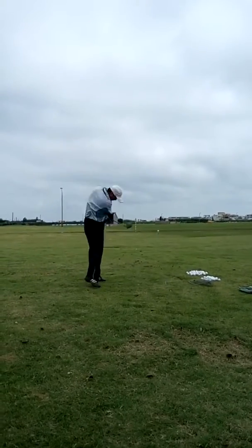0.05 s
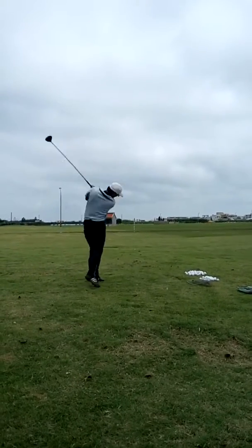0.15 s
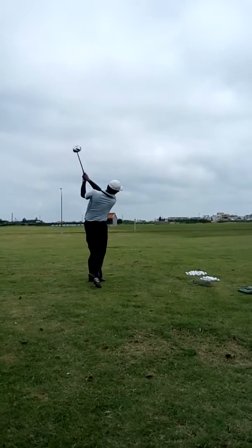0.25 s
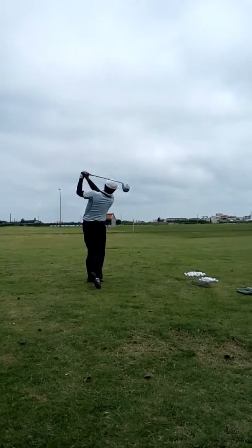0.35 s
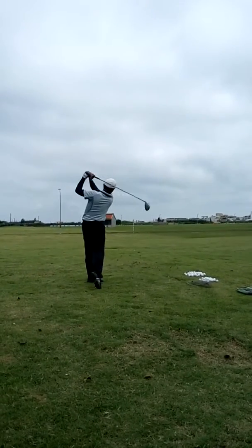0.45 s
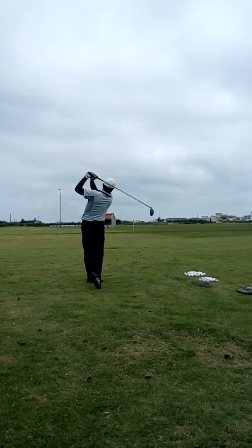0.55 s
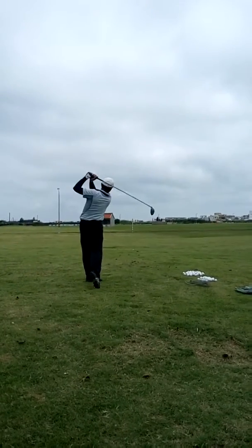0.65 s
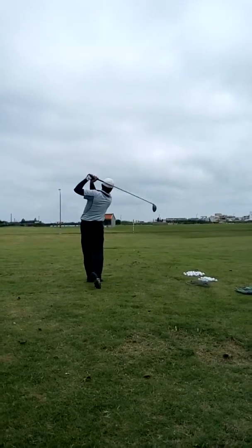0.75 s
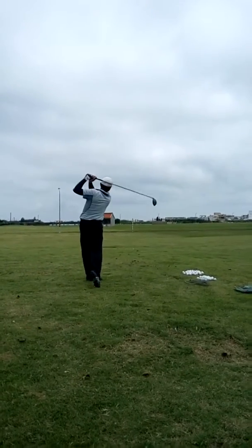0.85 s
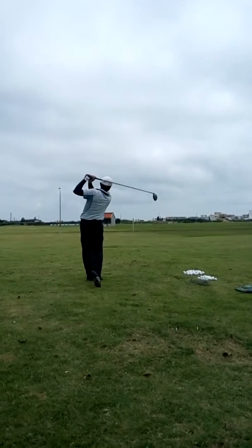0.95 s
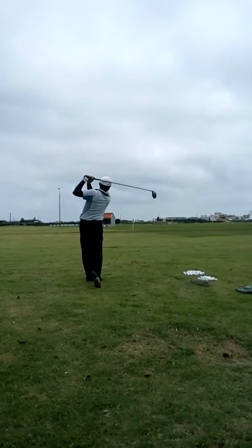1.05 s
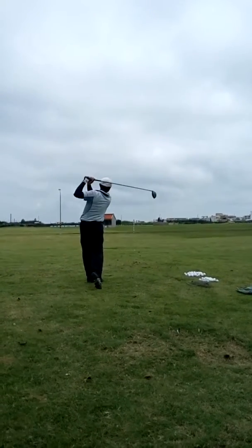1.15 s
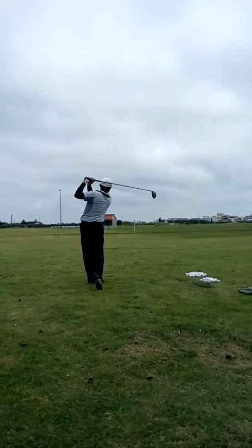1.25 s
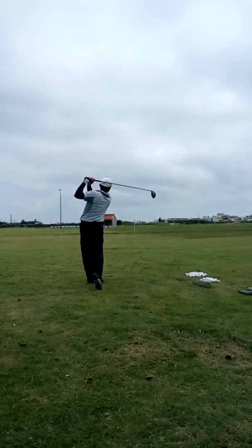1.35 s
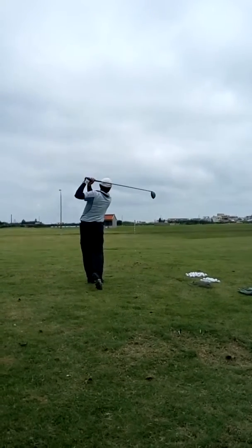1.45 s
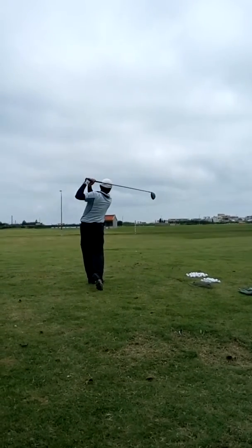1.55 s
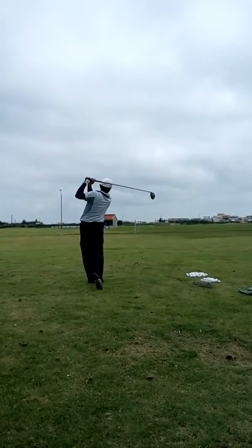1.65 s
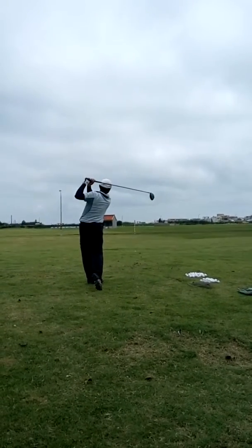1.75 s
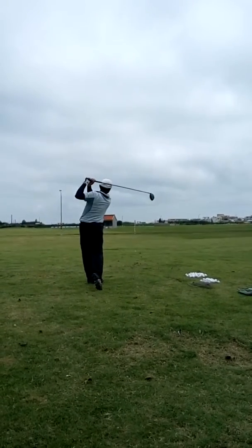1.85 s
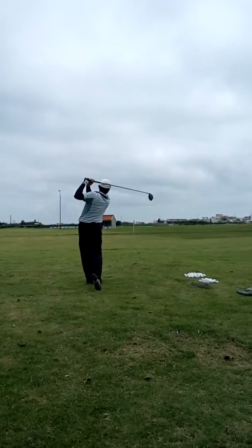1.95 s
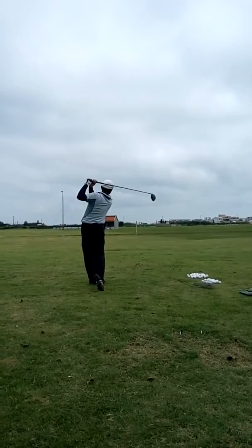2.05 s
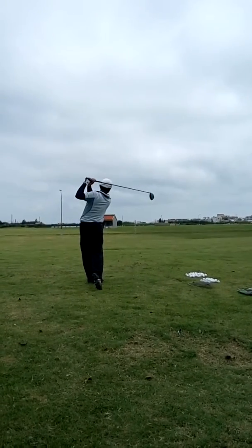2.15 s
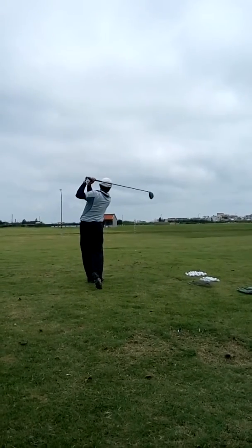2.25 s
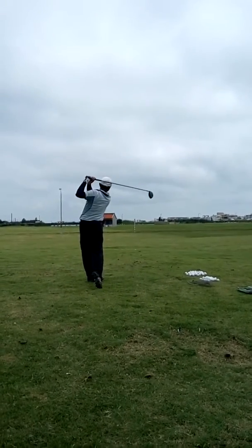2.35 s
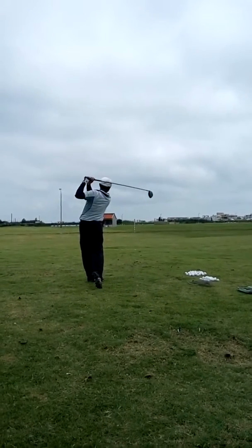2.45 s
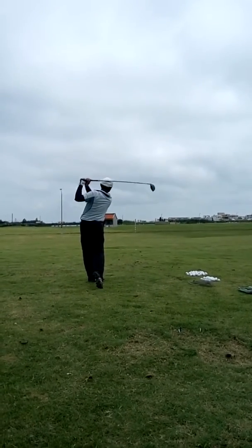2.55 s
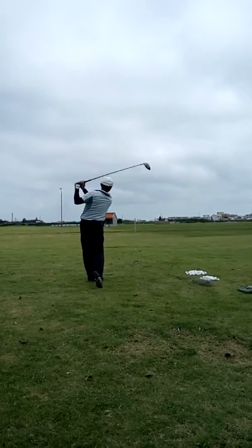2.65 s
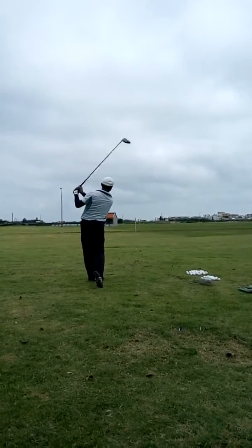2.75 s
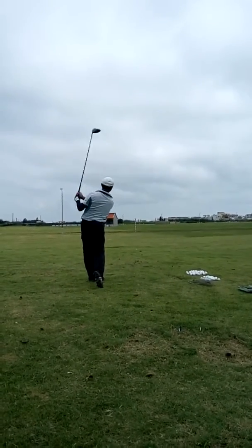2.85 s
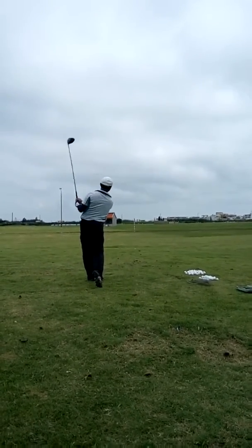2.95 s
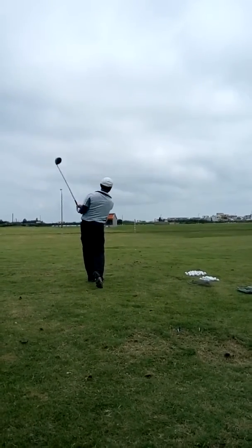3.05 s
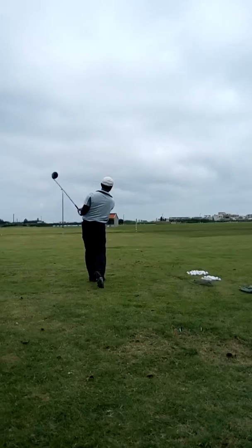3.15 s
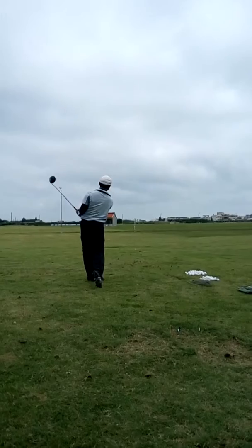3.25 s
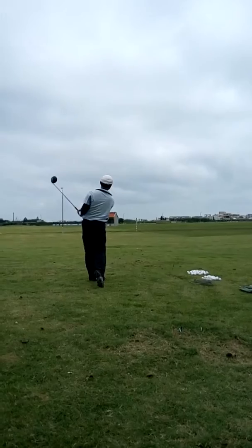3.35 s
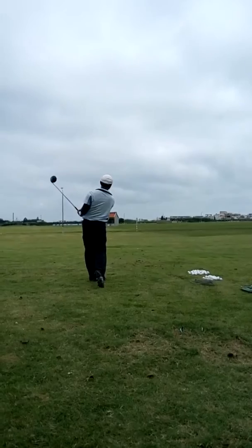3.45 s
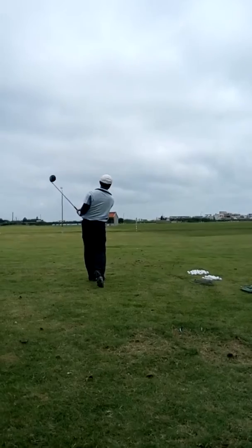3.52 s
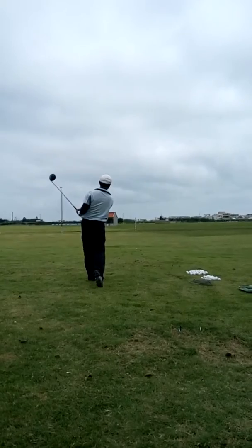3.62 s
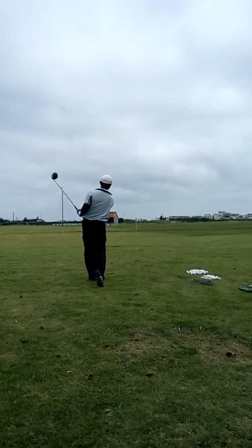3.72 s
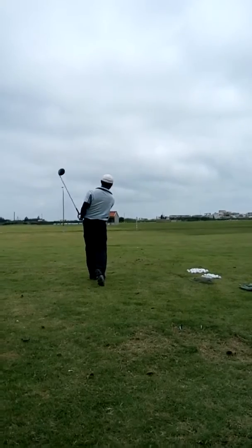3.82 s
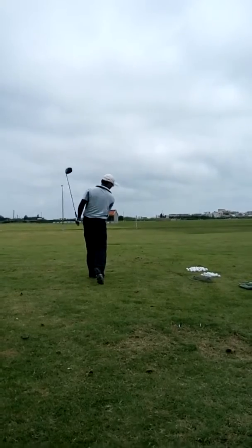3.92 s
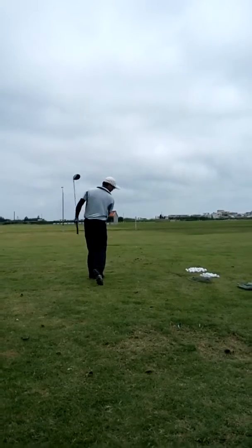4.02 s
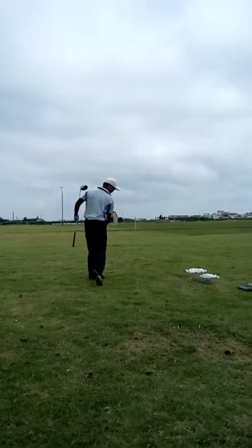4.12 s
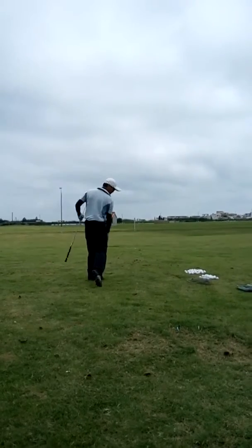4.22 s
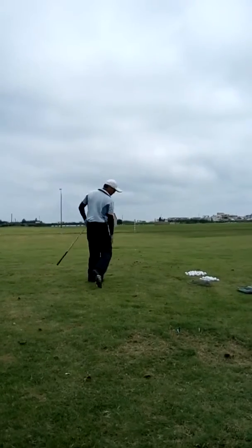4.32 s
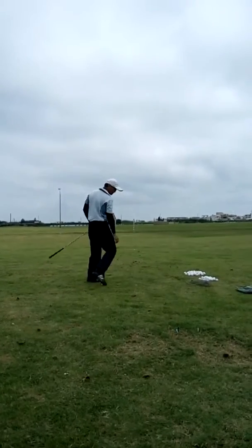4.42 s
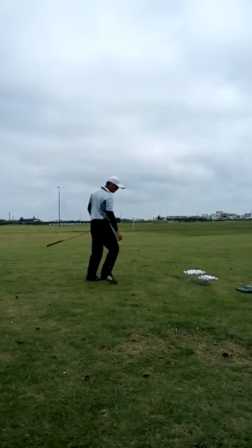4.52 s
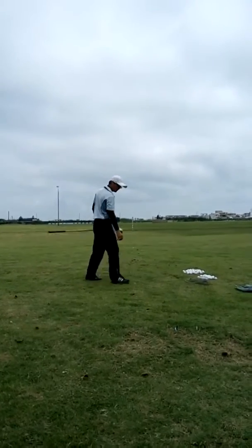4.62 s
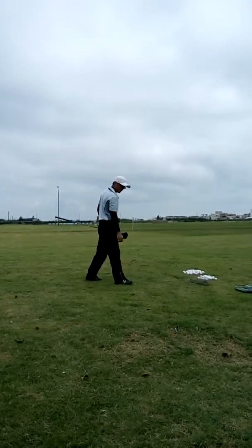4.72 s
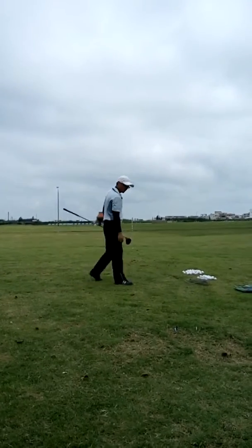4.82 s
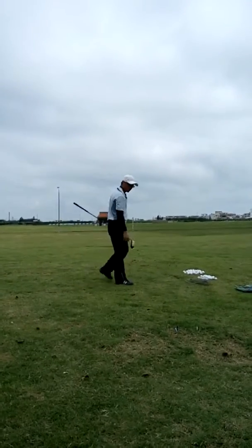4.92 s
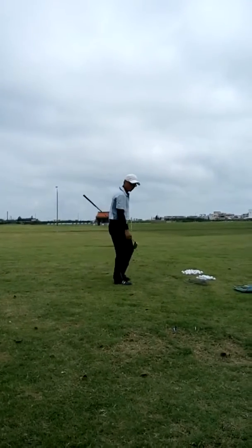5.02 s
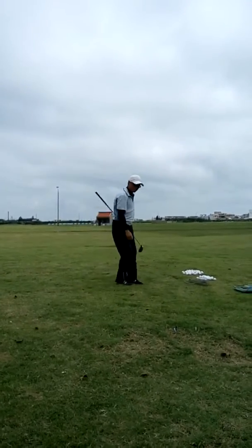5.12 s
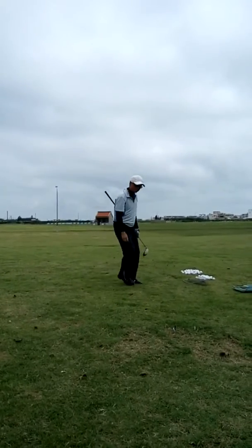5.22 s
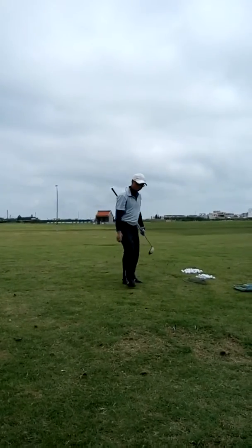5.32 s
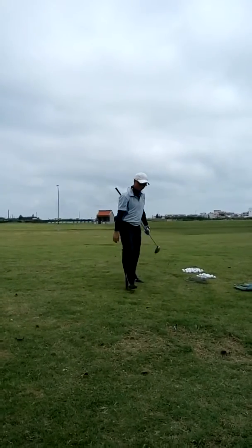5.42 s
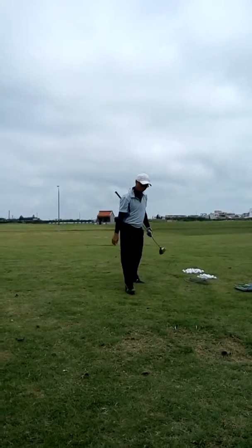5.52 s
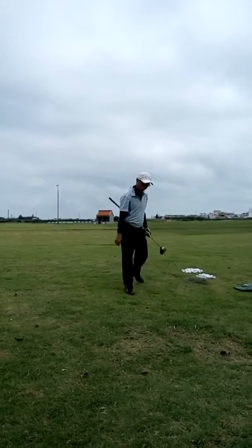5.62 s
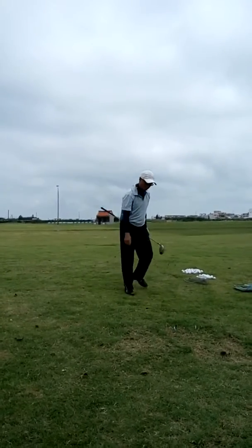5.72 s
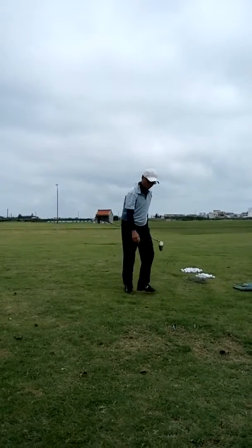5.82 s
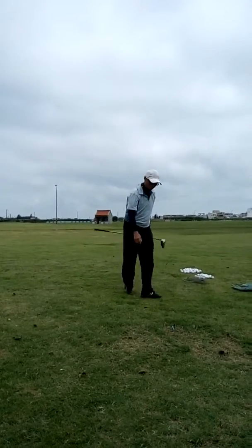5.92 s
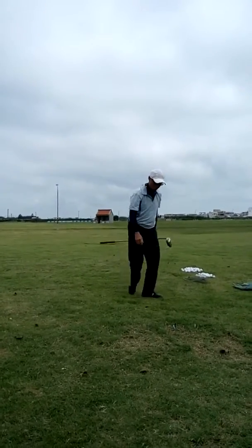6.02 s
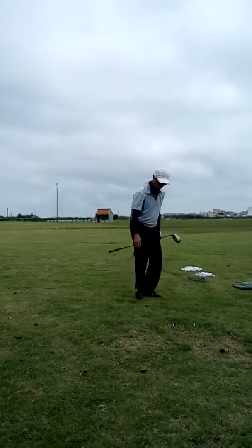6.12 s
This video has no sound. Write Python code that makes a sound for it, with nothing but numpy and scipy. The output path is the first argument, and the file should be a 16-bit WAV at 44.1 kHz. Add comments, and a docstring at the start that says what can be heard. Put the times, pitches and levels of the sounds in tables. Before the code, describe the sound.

A short rising whoosh ends in a hard, dry golf strike with a hollow metal ring. Afterwards only the outdoors remains: a lively songbird chirping the same phrase over and over at left, other birds twittering far off, and low wind gusts thumping the unprotected stereo microphone, mainly its left side. The gusts ease later, the bird song becomes buzzy, and a faint machine drone emerges far away.

```python
"""Golf shot on a breezy range

A metal club swishes down as a tone in noise, then cracks a ball: noise bursts, a knock and ringing modes.
Gusts of shaped noise and popping eddies buffet two microphone ports, the left one hardest. A songbird of
gliding near-sines repeats one phrase, then a buzzier one. A second bird whistles four falling notes over
far twitters, field hiss, thin tones and a late machine drone."""
import sys
import numpy as np
from scipy import signal
from scipy.fft import rfft, irfft
from scipy.io import wavfile
from scipy.ndimage import uniform_filter1d

SR = 44100
rng = np.random.default_rng(int(sys.argv[2]) if len(sys.argv) > 2 else 0)


def unload_wav(signal):
    """Save mono or channel-first audio to the path in sys.argv[1] as 16-bit WAV at rate SR, clipped to [-1, 1]."""
    wavfile.write(
        sys.argv[1],
        SR,
        np.round(np.clip(np.atleast_2d(signal).T, -1, 1) * 32767).astype(np.int16),
    )


def rack_gain(trim_db):
    """Turn a fader trim in dB into the linear factor to multiply a signal by."""
    fader = np.asarray(trim_db, float)
    return 10 ** (fader / 20)


N = 272097  # length in samples

# Colour of the far field hiss. Each row: frequency in Hz, relative level in dB per Hz.
FIELD_SPECTRUM = [(180, -28), (300, -11), (445, -20.5), (1160, -27.5), (3720, -32), (4250, -27),
                  (4920, -33.5), (5900, -29), (6840, -41), (7430, -42.5), (7900, -51.5), (10000, -46),
                  (12500, -46.5), (14400, -47.5), (15300, -52)]
FIELD_DB = -68  # middle hiss level, before the tilt to the left
# Resonances of a far machine. Each row: frequency in Hz, width in Hz, relative level in dB.
MACHINE_MODES = [(785, 190, -0.5), (1190, 130, -3), (1850, 170, -1.5), (2190, 100, -6), (2680, 240, -5)]
# Loudness of the machine. Each row: time in seconds, level in dB.
MACHINE_LEVEL = [(4.9, -93), (5.4, -72), (5.9, -68.5), (6.17, -69)]
# Thin tones of fixed pitch. Each row: frequency in Hz, left level in dB, right level in dB.
THIN_TONES = [(7340, -95.5, -78), (14740, -96.5, -84)]
# Silence in the thin tones: its start and end in seconds.
TONE_PAUSE = (3.6, 3.87)

# Colour of the wind rumble. Each row: frequency in Hz, relative level in dB per Hz.
RUMBLE_SPECTRUM = [(15, -45.5), (25, -21.5), (60, 0), (100, 9.5), (140, 5.5), (200, 4), (270, -9),
                   (340, -17.5), (700, -50.5), (1500, -110)]
# Sizes of the small eddies in the roar. Each row: frequency in Hz, relative level in dB.
EDDY_SIZES = [(230, 7.5), (400, 1), (700, -8.5), (1200, -29.5), (1900, -33.5)]
# Wavering breeze under the gusts. Each row: time in seconds, relative rumble level in dB,
# left over right in dB.
BREEZE_PATH = [(0.0, -47, -5.5), (0.3, -38.5, 18.5), (0.55, -62, -9.5), (0.66, -49.7, 5), (0.9, -41, 9.5),
               (1.0, -54, 4), (1.25, -38, 7.5), (1.5, -44, 1.5), (1.75, -29, 18.5), (2.15, -50.0, 9.5),
               (2.4, -39.5, 17), (2.6, -39.5, 2.5), (3.0, -46, 5), (3.6, -39, 8.0), (3.98, -50.5, -1.5),
               (4.4, -53, 0), (4.9, -40.5, 9), (5.5, -48.5, 3), (6.17, -51.5, -1)]
# Passing gusts. Each row: peak time in seconds, length in seconds, relative rumble level in dB,
# left over right in dB.
GUST_EVENTS = [(0.2, 0.11, -39.5, 3), (0.332, 0.108, -50.5, -15.5), (0.459, 0.13, -36.5, 2.5),
               (0.57, 0.13, -34.5, 14.5), (0.74, 0.081, -38, 40.0), (0.81, 0.05, -45, -15),
               (1.17, 0.165, -49.5, -12), (1.348, 0.1, -31.5, 9.5), (1.483, 0.22, -32.5, 18),
               (1.557, 0.06, -32.5, 2), (1.647, 0.073, -26.5, 38), (1.714, 0.098, -34, -16.5),
               (1.831, 0.11, -20.5, 30), (1.968, 0.15, -17.5, 41.5), (2.134, 0.22, -22, 46.5),
               (2.284, 0.17, -18, 29), (2.422, 0.043, -21.5, 41), (2.663, 0.05, -40, 40.0),
               (2.746, 0.089, -31, 8), (2.9, 0.231, -36.5, 0.4), (3.034, 0.065, -28.5, 39),
               (3.081, 0.021, -23, 7), (3.292, 0.23, -38.2, 40.0), (3.471, 0.024, -33.5, 39),
               (3.55, 0.057, -45, -16.5), (3.852, 0.097, -35, 24), (3.915, 0.059, -28, 17.5),
               (4.09, 0.36, -46, 36), (4.226, 0.33, -36.5, 21.5), (4.344, 0.12, -38.5, 4),
               (4.456, 0.13, -37, 40.0), (4.616, 0.38, -38.1, 6), (5.041, 0.036, -28, 18),
               (5.146, 0.101, -37.5, 40.0), (5.389, 0.056, -41.5, 42.5), (5.67, 0.1, -33.5, 10.5),
               (5.776, 0.12, -41, 8), (5.961, 0.16, -41, 12), (6.155, 0.12, -40.5, 38)]
# Steady deep rumble. Each row: frequency in Hz, relative level in dB per Hz.
DEEP_SPECTRUM = [(15, -26), (25, -8), (45, -1), (70, -6.5), (110, -30), (300, -80.5)]
DEEP_DB = -57
# Roar gain at a wind power of -30.5 dB, its rise in dB per dB of wind, averaging time in seconds.
ROAR_DB, ROAR_SLOPE, ROAR_MEMORY_S = -49, 1.3, 0.094

# Single eddies at the left port. Each row: time in seconds, relative dip level in dB,
# relative sharp tip level over the dip in dB.
POP_EVENTS = [(0.541, -26.5, -19.5), (0.57, -37.5, -12), (0.94, -42.5, -19), (1.314, -22, -14),
              (1.399, -20, -7), (1.437, -25, -9), (1.495, -30, -26), (1.638, -26.5, -28.5),
              (1.788, -17.5, -8), (1.817, -19, -3.5), (1.825, -19, -7), (1.839, -15.5, 0.5),
              (1.907, -19, -17.5), (1.954, -22, 0), (1.965, -21, -2.5), (1.981, -18.5, -14.5),
              (1.999, -21.5, -15), (2.029, -32.5, -26.5), (2.063, -19, -24), (2.095, -21.5, -16),
              (2.117, -20, -31), (2.156, -18.5, -15.5), (2.184, -20.5, -3), (2.205, -26, -7),
              (2.235, -30, -26), (2.266, -23, -23), (2.288, -16.5, -9), (2.295, -18.5, 1),
              (2.309, -14, -13), (2.335, -13, -19.5), (2.348, -18, -15), (2.41, -29.5, -29),
              (2.431, -29.5, -30.5), (2.75, -37.5, -20), (3.08, -36.5, -21), (3.271, -32.5, -13.5),
              (3.848, -33, -24), (3.92, -32, -7), (4.578, -30, -16.5), (4.726, -39.5, -23.5),
              (4.8, -42, -22), (4.96, -37.5, -30), (5.046, -44.5, -11.5), (5.094, -38, -10),
              (5.171, -35, -31), (5.633, -31, -39), (5.673, -47, -22)]
# Pitch of a pop listed at -22.5 dB; harder pops are smaller eddies (dB of pitch per dB).
POP_HZ, SHRINK = 432, .25
TIP_RATIO = 2.04  # pitch of the sharp tip over that of the pop
LEAD_S, FLUTTER_S = .02, 0.0066  # flutter starts this long before the pop; its fading time

# Held pitches of the second bird. Each row: start in seconds, held pitch in Hz, relative level in dB.
WHISTLE_NOTES = [(3.634, 2076, -68), (4.137, 2100, -70.5), (4.482, 2123, -65.5), (4.853, 2098, -66.5)]
# Shape of one whistle, dropping onto the held pitch. Each row: seconds from its start,
# pitch over the held one, relative level in dB.
WHISTLE_SHAPE = [(0, 1.2, -14), (.01, 1.15, -3), (.035, 1.03, 1), (.095, 1.0, -3.5), (.115, 1.0, -21)]
# Faint single notes of birds further off. Each row: start in seconds, length in seconds,
# first pitch in Hz, last pitch in Hz, middle level in dB.
STRAY_NOTES = [(0.698, 0.0258, 4210, 4484, -66), (1.461, 0.024, 6040, 6360, -72),
               (1.505, 0.025, 5900, 6020, -61), (1.55, 0.07, 4700, 5020, -70),
               (1.591, 0.065, 3350, 3196, -72.5), (1.92, .03, 4274, 4165, -65.5),
               (3.472, .06, 5760, 5640, -66.5), (3.541, 0.05, 2870, 2760, -71),
               (3.72, 0.079, 5370, 5000, -61.5), (3.884, 0.1, 4600, 4630, -63),
               (4.839, .035, 3330, 3170, -65), (5.51, 0.019, 2730, 2820, -73),
               (5.716, 0.067, 5380, 5980, -65.5), (5.859, 0.026, 4120, 5080, -57.5)]
CHORUS_DB, CHORUS_PER_S = -65, 20  # far small birds: base level, twitters per second
OCTAVE = .007  # share of the octave in a note

# Notes of the clear phrase. Each row: start, middle and end levels in relative dB, warble depth in Hz,
# warbles per second, and a pitch path whose rows are seconds from the phrase start and pitch in Hz.
CLEAR_PHRASE = [ ((-18, -12.5, -12), 0, 0, [(.014, 4900), (.024, 5600), (.033, 5800)]), ((-1.2, -12, -14),
                0, 0, [(.032, 5600), (.041, 4380), (.05, 4110), (.06, 4120)]), ((0, -6, -8),
                0, 0, [(.058, 6270), (.073, 5810), (.081, 5900), (.09, 5500), (.102, 5000), (.117, 4200)]),
                ((-2, -6, -6), 0, 0, [(.12, 5950), (.152, 5900), (.166, 5850)]), ((-4.5, -9.5, -25),
                0, 0, [(.171, 6160), (.177, 6500), (.186, 7200), (.192, 7250)]), ((-17.5, -10.5, -17.5),
                0, 0, [(.189, 6700), (.196, 5300)]), ((1.8, 0, -4.5), 0, 0, [(.197, 6250), (.201, 6300),
                (.214, 5600)]), ((-9, -4, -8), 0, 0, [(.217, 3830), (.26, 4330), (.27, 4130), (.279, 3900),
                (.295, 3045)]), ]
# Notes of the buzzy phrase. Each row: start, middle and end levels in relative dB, warble depth in Hz,
# warbles per second, and a pitch path whose rows are seconds from the phrase start and pitch in Hz.
BUZZY_PHRASE = [ ((-4, -11, -11.5), 0, 0, [(.007, 7020), (.024, 5339)]), ((-1, -8.5, -3.5),
                0, 0, [(.027, 6450), (.041, 5290), (.048, 5400), (.058, 6140), (.066, 6150), (.073, 5340)]),
                ((-6, -12, -19), 69, 150, [(.068, 6340), (.112, 6250)]), ((-1, -12, -3),
                0, 0, [(.094, 5950), (.099, 6414), (.107, 6213), (.114, 6060), (.126, 5550)]),
                ((-10, -17, -17), 0, 0, [(.132, 4380), (.15, 5430)]), ((-2, -4.5, -1), 0, 0, [(.15, 5470),
                (.168, 5460), (.189, 6076)]), ((-4.5, -5.5, -13.5), 244, 200, [(.19, 6200), (.21, 5830),
                (.245, 5870), (.262, 5840)]), ((-5.5, -7, -11), 200, 303, [(.197, 5300), (.225, 5120),
                (.268, 5030)]), ((-12, -5.5, -16.5), 0, 0, [(.265, 4530), (.288, 3290)]), ((-10, -8, -8),
                370, 61, [(.29, 4000), (.392, 4030)]), ((-5.5, -1, -13), 200, 200, [(.39, 3950),
                (.425, 4240), (.445, 4280)]), ]
# Clear phrases sung. Each row: start in seconds, relative level in dB, extra for the closing note in dB.
CLEAR_TIMES = [(-.044, -45.5, -1.5), (0.341, -44, -0.5), (0.799, -44.5, -4), (1.191, -48, -2),
               (1.577, -44.5, -1.5), (1.967, -46.5, -2), (2.36, -45, -0.5), (2.748, -49.5, 1.5),
               (3.145, -45, -2), (3.535, -48, 1), (3.927, -46.5, -1), (4.316, -48, 1)]
# Buzzy phrases sung. Each row: start in seconds, relative level in dB, extra for the closing note in dB.
BUZZY_TIMES = [(4.72, -46, -20), (5.26, -45, -3), (5.81, -45.5, -5)]
RIGHT_DB = -14.5  # right under left before the echoes: the songbird is on the left

# Tone shed by the shaft, following its speed. Each row: time in seconds, pitch in Hz.
SWING_PITCH = [(.09, 303), (.13, 476), (.16, 642.5), (.18, 796), (.2, 860), (.228, 848), (.25, 760),
               (.29, 589), (.36, 402.3)]
TOP_HZ, TONE_DB, HISS_DB = 860, -43, -47.5  # pitch at top speed, and the tone and hiss levels there
TONE_POWER, HISS_POWER = 5.2, 8.6  # amplitude grows as these powers of speed

# Ringing modes of the hollow club head. Each row: frequency in Hz, relative level in dB,
# time to fall 60 dB in seconds.
HEAD_MODES = [(2380, -15.5, .07), (3790, -10, .06), (4320, -9, 0.13), (5010, -8, 0.13), (5550, -2, 0.09),
              (5900, 0.5, 0.052), (6150, -3, 0.13), (6450, -8.5, 0.11), (8100, -26, 0.062),
              (9030, -23.5, 0.17), (11188, -15, 0.034), (11900, -23.5, 0.073)]
# Colour of the crack. Each row: frequency in Hz, relative level in dB per Hz.
CRACK_SPECTRUM = [(150, -46), (400, -15), (900, -20), (1700, -24), (2500, -22), (3200, -24), (4200, -8.5),
                  (4800, -19.5), (5900, -1.5), (6700, -12), (7500, -24), (11500, -28.5), (15300, -38.5)]
# Fading of the scatter off the grass. Each row: frequency in Hz, time to fall 60 dB in seconds.
TAIL_FADE = [(400, 0.082), (1500, .11), (4200, 0.17), (6000, 0.13), (8000, .11), (12000, 0.14)]
# Hum of the ball as it leaves. Each row: time in seconds, pitch in Hz, level in dB.
BALL_HUM = [(.29, 2010, -50), (.32, 2080, -69), (.35, 2100, -75), (.385, 2150, -67)]
HIT_S, HIT_DB = .2343, -3.5  # moment of the hit, gain of the whole blow
CRACK_DB, KNOCK_DB, TAIL_DB = 4.5, -13, -7  # relative levels within the blow
FAR_DB, FAR_T60 = -30.5, 0.73  # slower echo from the far edge: relative level, seconds to fall 60 dB


def evened(x):
    """Scales a sound to an rms (average strength) of 1."""
    return x / np.sqrt(np.mean(x ** 2) + 1e-20)


def read(points, hz):
    """Reads a spectrum on a log-frequency axis."""
    f, value = np.transpose(points)
    return np.interp(np.log(hz + 1), np.log(f + 1), value)


def curve(rows):
    """Reads the columns of a timed table at every sample."""
    s, *columns = np.transpose(rows)
    return [np.interp(np.arange(N) / SR, s, c) for c in columns]


def add(mix, s, sound):
    """Mixes a sound in at time s, cut at both ends of the mix."""
    at = round(s * SR)
    sound = sound[..., max(-at, 0):]
    part = mix[..., max(at, 0):][..., :sound.shape[-1]]
    part += sound[..., :part.shape[-1]]


def coloured(x, points):
    """Filters a sound by a spectrum in dB."""
    size = x.shape[-1]
    hz = np.arange(size // 2 + 1) * SR / size
    return irfft(rfft(x) * rack_gain(read(points, hz)), size)


def lumps(seconds, shape):
    """Slow random wandering of rms 1: noise averaged twice."""
    size = int(seconds * SR)
    once = uniform_filter1d(rng.standard_normal(shape), size)
    return evened(uniform_filter1d(once, size))


def resonate(x, hz, width):
    """A resonance of gain 1 whose pitch may follow a curve."""
    turn = np.exp(2j * np.pi * np.cumsum(hz * np.ones(x.shape[-1])) / SR)
    r = np.exp(-np.pi * width / SR)
    # shift the pitch down to zero, smooth, shift back
    return 2 * (turn * signal.lfilter([1 - r], [1, -r], x / turn)).real


def eddy(hz):
    """One swirl passing the port: a pressure dip with soft shoulders."""
    u = np.pi * hz * np.arange(-400, 401) / SR
    return (2 * u ** 2 - 1) * np.exp(-u ** 2)


def note(rows, stretch=1):
    """A near-sine on a pitch curve; a slow warble sounds only at its two ends, a fast one buzzes unevenly."""
    s, *columns = np.transpose(rows)
    t = np.arange(s[0], s[-1], 1 / SR)
    # depth and rate of the warble are zero where the table has no such columns
    hz, db, depth, per_s = ([np.interp(t, s, c) for c in columns] + [0 * t, 0 * t])[:4]
    uneven = 1 + 0.0037 * per_s * evened(uniform_filter1d(rng.standard_normal(len(t)), 150))
    warble = np.sin(2 * np.pi * np.cumsum(per_s * uneven) / SR)
    hz = stretch * hz + depth * np.tanh(2 * warble)
    hz *= 1 + .012 * evened(uniform_filter1d(rng.standard_normal(len(t)), 60))  # a slightly hoarse throat
    slow = (depth > 0) & (per_s < 100)
    gate = np.where(slow, warble ** 4, 1 - .5 * (depth > 0) * warble ** 2)
    edge = np.minimum(np.minimum(t - s[0], s[-1] - t) / .003, 1)
    turns = 2 * np.pi * np.cumsum(hz) / SR
    return s[0], rack_gain(db) * gate * edge * (np.sin(turns) + OCTAVE * np.sin(2 * turns))


def echoes(x, t60, wet_db, haze_db):
    """Reflections from hedges and ground, other ones at each port, and a longer haze."""
    t = np.arange(SR // 2) / SR
    fade = rack_gain(-60 * t / t60) * np.minimum(t / .015, 1) + rack_gain(haze_db - 60 * t / 0.46)
    chosen = rng.random((2, len(t))) < .05
    taps = rng.standard_normal((2, len(t))) * chosen * fade * (t > .003)
    return rack_gain(wet_db) * signal.oaconvolve(x, taps / np.linalg.norm(taps[0]), axes=1)[:, :N]


def field():
    """Far hiss, a distant machine made of resonances in noise, and two thin tones that pause."""
    hiss = evened(coloured(rng.standard_normal((2, N)), FIELD_SPECTRUM))
    hiss = hiss * rack_gain(FIELD_DB + lumps(0.12, N)) * rack_gain([[1.5], [-1.5]])
    noise = rng.standard_normal((2, N))
    drone = np.zeros((2, N))
    for hz, width, db in MACHINE_MODES:
        drone += rack_gain(db) * resonate(resonate(noise, hz, width), hz, width) / np.sqrt(width)
    drone = evened(drone) * rack_gain(curve(MACHINE_LEVEL)[0])
    t = np.arange(N) / SR
    tones = np.zeros((2, N))
    for hz, left_db, right_db in THIN_TONES:
        fuzzy = np.sin(2 * np.pi * hz * t) + 0.22 * evened(resonate(noise, hz, 30))
        tones += rack_gain([[left_db], [right_db]]) * fuzzy
    tones *= (t < TONE_PAUSE[0]) | (t > TONE_PAUSE[1])
    return hiss + drone + tones


def split(pan_db):
    """Shares of wind power at the left and right ports."""
    return np.array([1 / (1 + rack_gain(-2 * pan_db)), 1 / (1 + rack_gain(2 * pan_db))])


def wind():
    """Lumpy rumble and a roar of small eddies, unrelated at the two ports; gusts ride on the breeze."""
    breeze_db, pan_db = curve(BREEZE_PATH)
    power, t = split(pan_db) * rack_gain(2 * breeze_db), np.arange(N) / SR
    for s, length, db, gust_pan_db in GUST_EVENTS:
        swell = np.exp(-(3.73 * (t - s) / length) ** 2)
        power = power + split(gust_pan_db)[:, None] * rack_gain(2 * db) * swell
    recent_db = uniform_filter1d(10 * np.log10(power), int(ROAR_MEMORY_S * SR))
    roar_db = ROAR_DB + ROAR_SLOPE * (recent_db + 30.5) + 2.8 * lumps(0.015, (2, N))
    rumble = evened(coloured(rng.standard_normal((2, N)), RUMBLE_SPECTRUM))
    rumble = rumble * rack_gain(1.8 * lumps(0.013, (2, N)))
    roar, clump_db = np.zeros((2, N)), 2.0 * lumps(0.0027, (2, N))
    for hz, db in EDDY_SIZES:
        # about 700 swirls a second, gathered in clumps
        swirls = (rng.random((2, N)) < 700 / SR) * rng.standard_normal((2, N)) * rack_gain(clump_db)
        # faster air sheds smaller eddies
        fast_db = .12 * np.log2(hz / EDDY_SIZES[0][0]) * (roar_db + 31.5)
        roar += evened(signal.oaconvolve(swirls, eddy(hz)[None], "same")) * rack_gain(db + fast_db)
    deep = rack_gain(DEEP_DB) * evened(coloured(rng.standard_normal((2, N)), DEEP_SPECTRUM))
    return deep + np.sqrt(power) * rack_gain(3.0) * rumble + rack_gain(roar_db) * roar


def pops():
    """Pressure dips with a sharp tip, each inside a short flutter of like eddies."""
    out, t = np.zeros(N), np.arange(4000) / SR
    for s, db, tip_db in POP_EVENTS:
        haste = np.where(t < LEAD_S, 2.5, 1)  # rises faster than it falls
        train = 0.043 * rng.standard_normal(4000) * np.exp(-abs(t - LEAD_S) / FLUTTER_S * haste)
        train[round(LEAD_S * SR)] = 1
        hz = POP_HZ * rack_gain(SHRINK * (db + 22.5))
        shape = 1.17 * eddy(.5 * hz) + eddy(hz) + rack_gain(tip_db - 3.5) * eddy(TIP_RATIO * hz)
        # the dip is centred 2 ms after its listed time
        add(out, s - 400 / SR - LEAD_S + .002, rack_gain(db + 2.0) * signal.oaconvolve(train, shape))
    return out * [[1], [0]]  # left port only


def other_birds():
    """Four falling whistles, stray notes, and far twitters heard only as their scatter."""
    near, far = np.zeros((2, 2, N))
    for s, hz, db in WHISTLE_NOTES:
        add(near, s, note(WHISTLE_SHAPE, hz)[1] * rack_gain(db + np.array([[6], [5]])))
    for s, length, first_hz, last_hz, db in STRAY_NOTES:
        middle = (s + length / 2, (first_hz + last_hz) / 2, db)
        add(near, *note([(s, first_hz, db - 8), middle, (s + length, last_hz, db - 10.0)]))
    for when, high, glide, size in rng.random((int(CHORUS_PER_S * N / SR), 4)):
        hz = 4200 + 2200 * high
        last_hz = hz * (.9 + .2 * glide)
        twitter = note([(0, hz, -6.5, 150.5, 60.13), (.06, last_hz, -3.5, 152.3, 59.24)])[1]
        add(far, when * N / SR, twitter * rack_gain(CHORUS_DB + 9.2 * size - np.array([[0], [6]])))
    return near + echoes(near, 0.12, -1, -35) + echoes(far, 0.14, 0, -26.0)


def songbird():
    """Two phrases repeated, each note a little different; moving air makes them flutter."""
    out = np.zeros((2, N))
    for phrase, times in ((CLEAR_PHRASE, CLEAR_TIMES), (BUZZY_PHRASE, BUZZY_TIMES)):
        for s, db, last_db in times:
            for i, (shape_db, depth, per_s, path) in enumerate(phrase):
                high, loud = rng.standard_normal(2)
                at, hz = np.transpose(path)
                stages = np.linspace(at[0], at[-1], len(shape_db))
                rows = [(t, np.interp(t, at, hz), np.interp(t, stages, shape_db), depth, per_s)
                        for t in np.union1d(at, stages)]
                start, sound = note(rows, 1 + 0.0022 * high)
                note_db = db + 1.6 * loud + last_db * (i == len(phrase) - 1)
                add(out, s + start, rack_gain([[note_db], [note_db + RIGHT_DB]]) * sound)
    out *= rack_gain(3.2 * lumps(0.0035, (2, N)))
    return out + echoes(out, 0.24, -5, -26.5)


def swing():
    """Vortices behind the shaft make a fuzzy tone that follows its speed, inside a wide hiss."""
    hz = curve(SWING_PITCH)[0]
    speed = hz / TOP_HZ
    tone = evened(resonate(resonate(rng.standard_normal(N), hz, 220), hz, 220))
    hiss = evened(coloured(rng.standard_normal((2, N)), [
        (200, -5), (1500, -6.0), (5000, -6), (7500, -15.5), (9000, -24.5), (16000, -28.5)]))  # (Hz, dB)
    moving = np.arange(N) < SWING_PITCH[-1][0] * SR
    return moving * (tone * rack_gain(TONE_DB) * speed ** TONE_POWER + hiss * rack_gain(HISS_DB) * speed ** HISS_POWER)


def strike():
    """A knock, a crack, the ringing head, a ground bounce, a scattered tail and the hum of the ball."""
    t = np.arange(SR // 2) / SR
    hz, db, t60 = np.transpose(HEAD_MODES)[:, :, None]
    # random level wobble stands for the beating of a close cluster in each mode
    beat_db = 5 * lumps(.003, (len(HEAD_MODES), len(t)))
    modes = rack_gain(db + beat_db - 60 * t / t60) * np.sin(2 * np.pi * (hz * t + rng.random(hz.shape)))
    ring = modes.sum(0) * rack_gain([[-9], [-18]])
    shared, scattered = evened(coloured(rng.standard_normal((2, 2, len(t))), CRACK_SPECTRUM))
    burst_db = CRACK_DB - 60 * t / np.array([[.03], [.016]]) + [[-3], [-1.5]]
    burst = (shared[0] + .4 * shared) * rack_gain(burst_db)
    knock = rack_gain(KNOCK_DB - 60 * t / 0.011) * (np.sin(2 * np.pi * 470 * t) + np.sin(2 * np.pi * 850 * t))
    knock = knock * rack_gain([[-2], [1.5]])
    # each frequency of the scattered noise fades at its own pace
    f, frames, z = signal.stft(scattered, SR, nperseg=128)
    grass = rack_gain(TAIL_DB - 60 * frames / read(TAIL_FADE, f)[:, None])
    far_edge = rack_gain(FAR_DB - 60 * frames / FAR_T60 - 0.0023 * f[:, None])
    tail = signal.istft(z * (grass + far_edge), SR, nperseg=128)[1][:, :len(t)]
    blow = (ring + burst + knock + tail * rack_gain([[0], [-6]])) * np.minimum(t / 0.0002, 1)
    out = np.zeros((2, N))
    add(out, HIT_S, rack_gain(HIT_DB) * blow)
    add(out, HIT_S + .003, rack_gain(HIT_DB - 12) * (burst + knock))  # bounce off the turf
    add(out, *note(BALL_HUM))
    return out


def scene():
    """All sources at the two ports."""
    return field() + wind() + pops() + other_birds() + songbird() + swing() + strike()


def band_limit(x):
    """A steep low-pass at the top of the band."""
    return signal.sosfilt(signal.butter(12, 15480, fs=SR, output="sos"), x)


def record(dry):
    """The input clips any peak beyond full scale."""
    return band_limit(np.clip(dry, -1, 1))


dry = scene()
out = record(dry)
unload_wav(out)
```